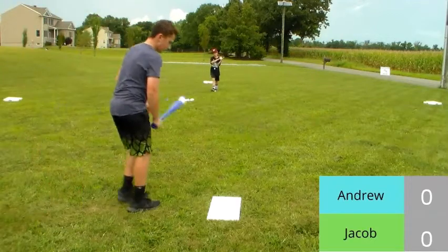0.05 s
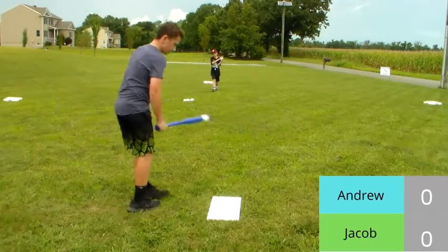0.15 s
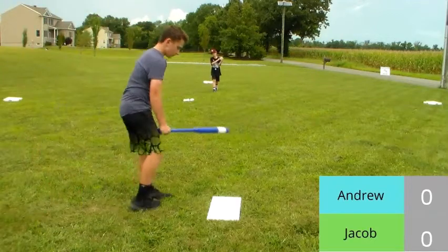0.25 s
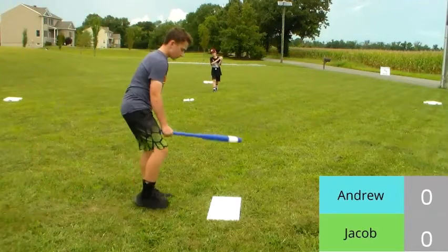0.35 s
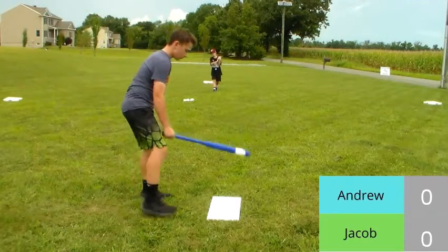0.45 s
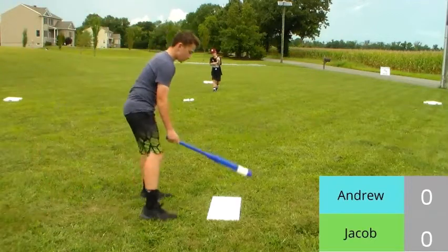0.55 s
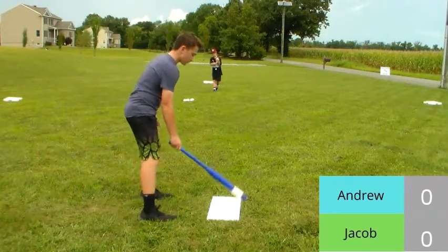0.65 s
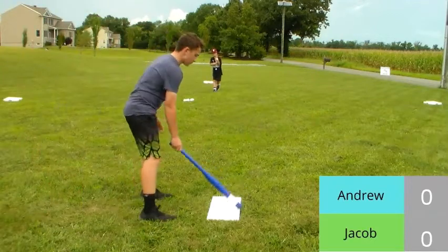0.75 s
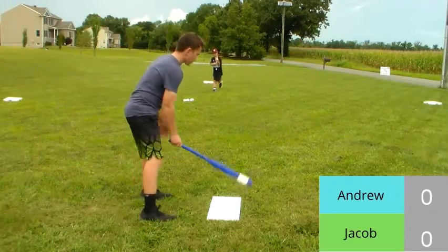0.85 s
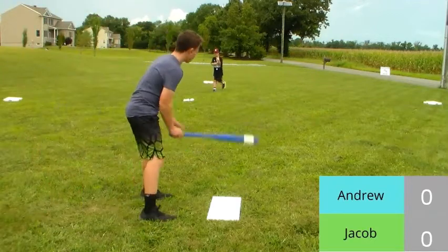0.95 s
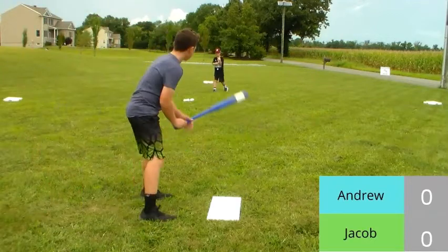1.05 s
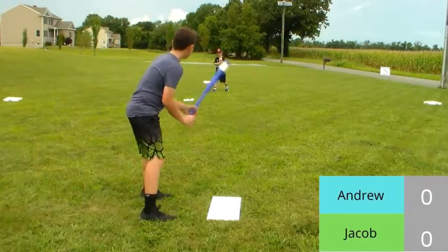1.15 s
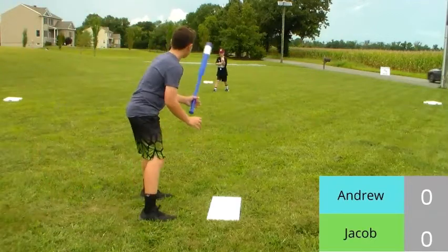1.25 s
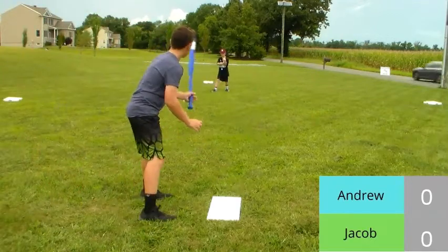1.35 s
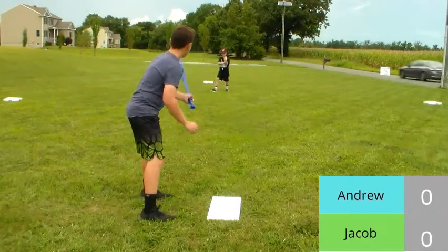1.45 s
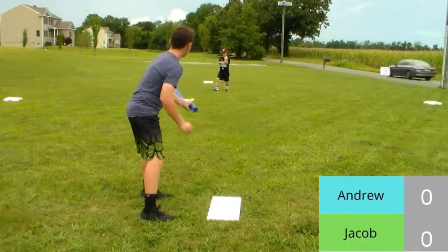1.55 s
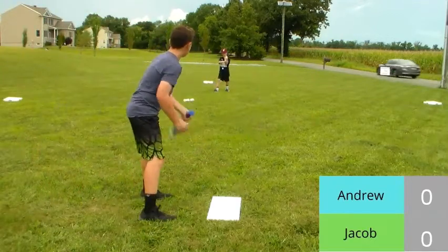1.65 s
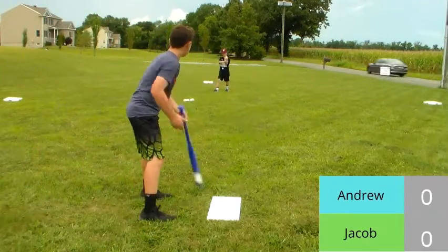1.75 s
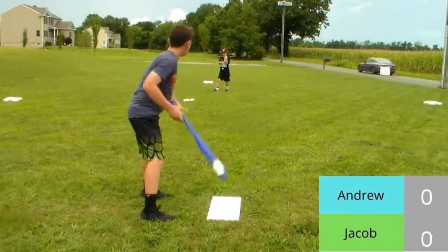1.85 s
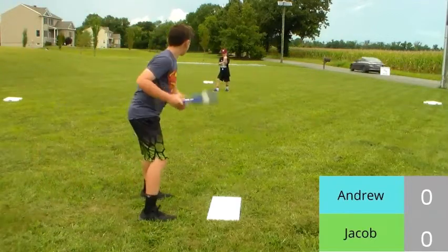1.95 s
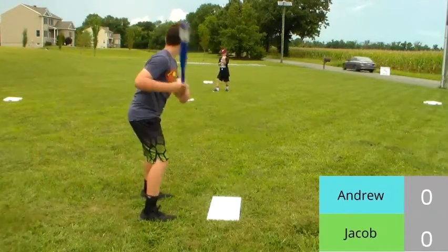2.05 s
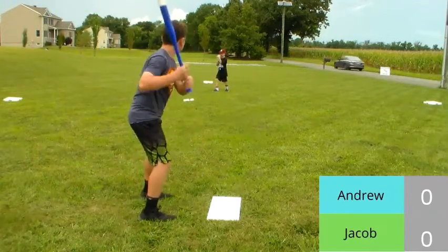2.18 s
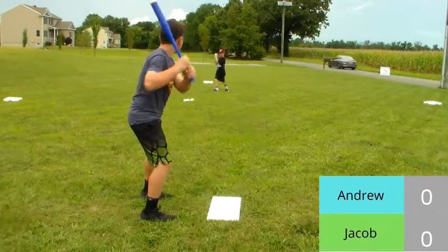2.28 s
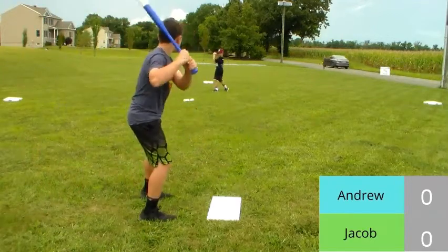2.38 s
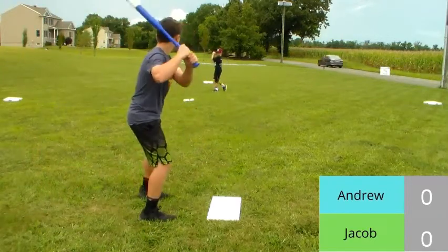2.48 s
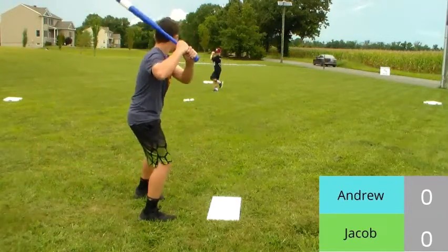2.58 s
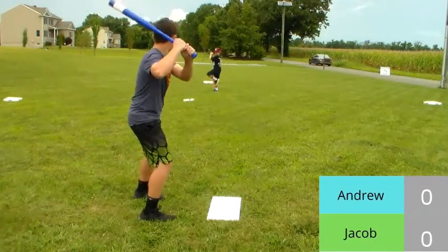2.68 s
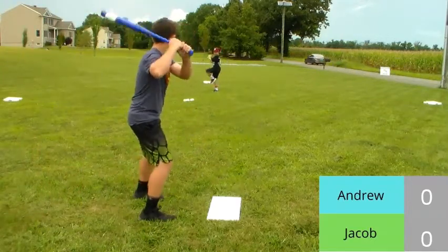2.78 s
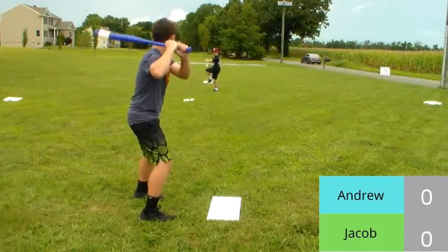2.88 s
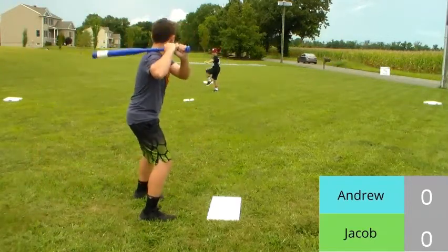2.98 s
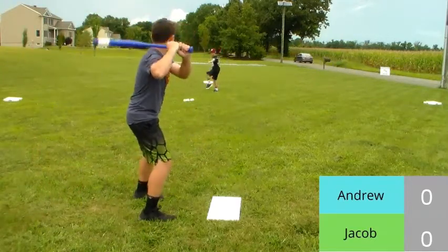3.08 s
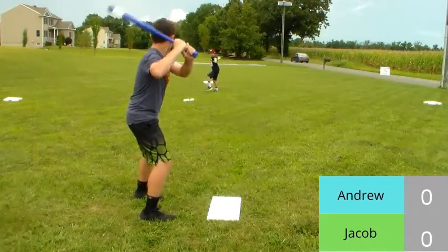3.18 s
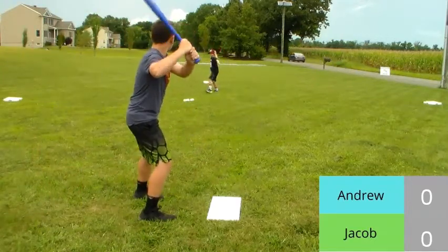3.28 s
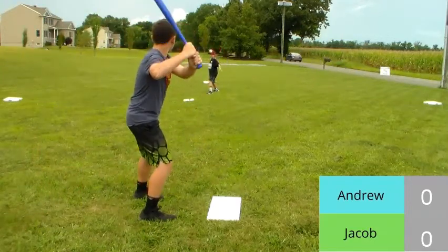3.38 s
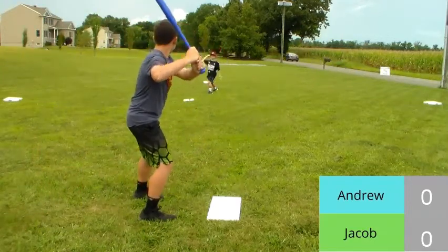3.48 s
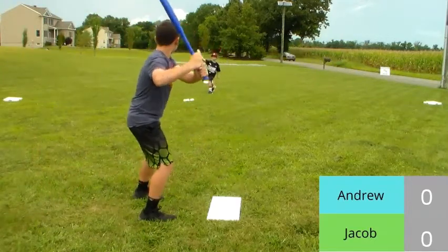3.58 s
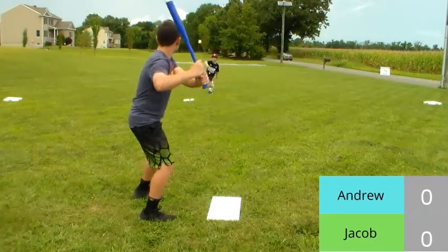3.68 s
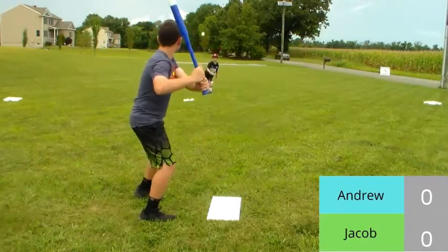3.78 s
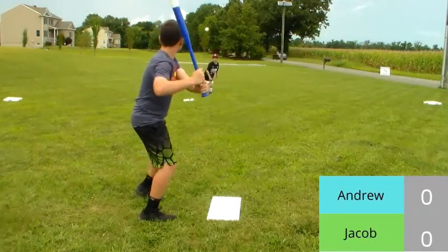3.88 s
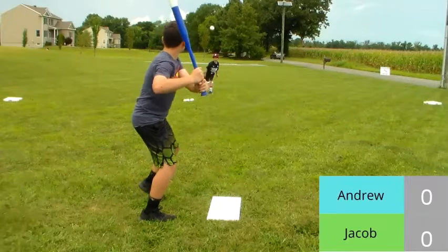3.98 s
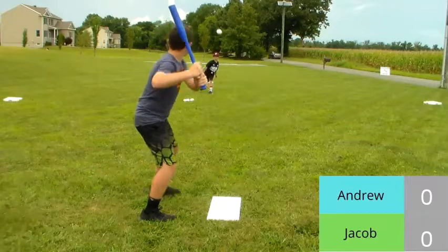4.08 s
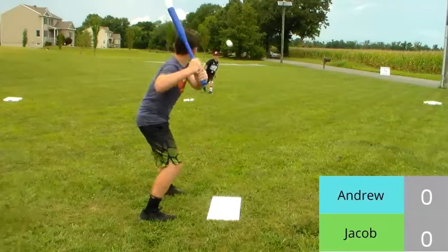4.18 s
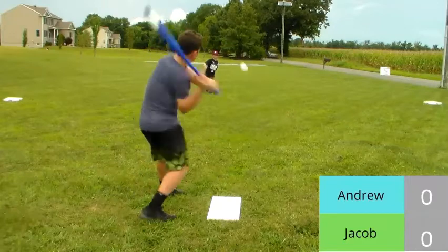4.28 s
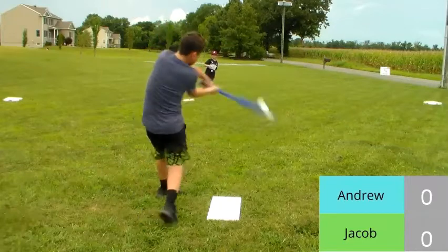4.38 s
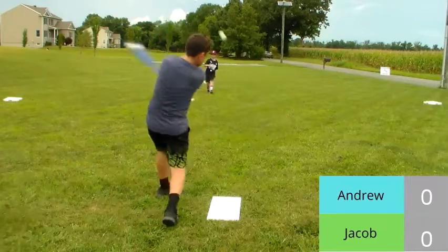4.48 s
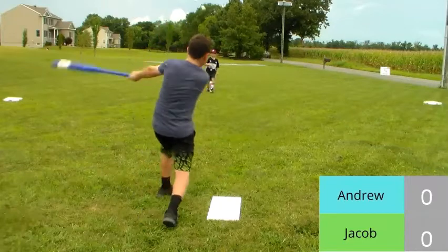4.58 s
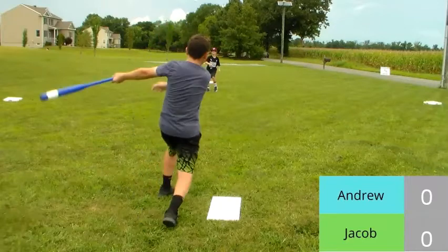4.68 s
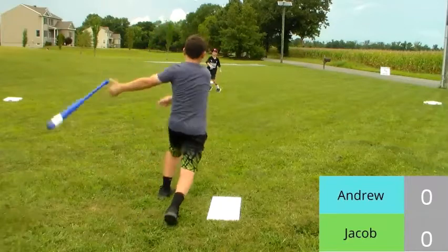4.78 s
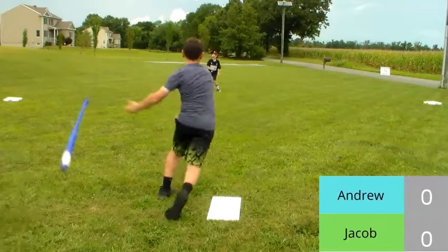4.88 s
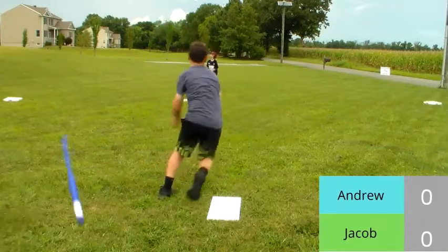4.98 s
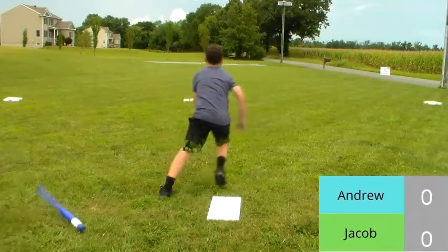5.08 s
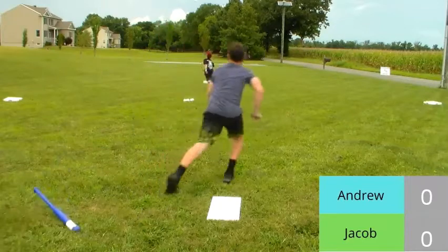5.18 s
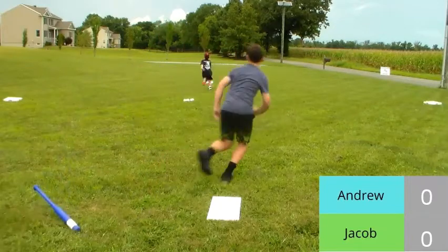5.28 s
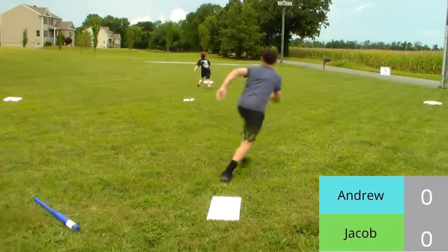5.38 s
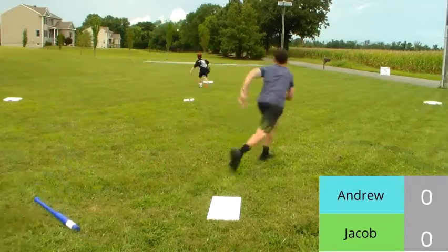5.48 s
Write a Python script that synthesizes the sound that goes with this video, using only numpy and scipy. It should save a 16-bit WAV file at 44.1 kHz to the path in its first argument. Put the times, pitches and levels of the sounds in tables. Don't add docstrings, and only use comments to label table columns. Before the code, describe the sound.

A hollow bat clatters on a plastic plate, insects chirp over a receding car, then a loud crack echoes before running footsteps in grass.

```python
import sys
import numpy as np
from scipy import signal
from scipy.io import wavfile
from scipy.ndimage import uniform_filter1d, map_coordinates

SR = 44100
rng = np.random.default_rng(int(sys.argv[2]) if len(sys.argv) > 2 else 0)


def gain_from_db(level_db):
    decades = np.asarray(level_db, float) / 20
    return 10 ** decades


def generate_wav(sig):
    pcm = np.round(np.clip(np.atleast_2d(sig).T, -1, 1) * 32767).astype(np.int16)
    wavfile.write(sys.argv[1], SR, pcm)


N = 244480
TOP_HZ = 14300


def evened(x):
    return x / np.sqrt(np.mean(x ** 2) + 1e-20)


def read(points, hz):
    point_hz, value = np.transpose(points)
    return np.interp(np.log(hz + 1), np.log(point_hz + 1), value)


def curve(rows, column=1):
    rows = np.asarray(rows)
    return np.interp(np.arange(N) / SR, rows[:, 0], rows[:, column])


def add(mix, start_s, sound):
    part = mix[..., round(start_s * SR):]
    part = part[..., :sound.shape[-1]]
    part += sound[..., :part.shape[-1]]


def noise(points, same, patchy_db, size=1024):
    hop = size // 4
    hz = np.fft.rfftfreq(size, 1 / SR)
    a, b, c, d, patches = rng.standard_normal((N // hop + 5, len(hz), 5)).T
    patches = uniform_filter1d(patches, size=9, axis=0)
    patches = evened(uniform_filter1d(patches, size=11, axis=1))
    same = np.clip(same, 0, 1)
    left = a + 1j * b
    right = same * left + np.sqrt(1 - same ** 2) * (c + 1j * d)
    level = gain_from_db(read(points, hz)[:, None] + patchy_db * patches)
    both = np.array([left, right]) * level * (hz < TOP_HZ)[:, None]
    sound = signal.istft(both, nperseg=size, noverlap=size - hop)[1]
    return evened(sound[:, :N])


def panned(db):
    return gain_from_db(np.array([db / 2, -db / 2]))[:, None]


def lagged(x, samples):
    when = np.arange(N) - samples
    return np.array([map_coordinates(x[0], [when], order=3, mode="nearest"), x[1]])


def puff(length_s, edge):
    return signal.windows.tukey(round(length_s * SR), np.clip(edge, .05, 1))


def ring(modes, blow, turn):
    t = np.arange(4000) / SR
    sound = np.zeros(len(t))
    for k, (hz, db, t60) in enumerate(modes):
        sound += turn ** k * gain_from_db(db - 60 * t / t60) * np.sin(2 * np.pi * hz * t)
    return np.convolve(sound, blow / blow.sum())


# (frequency [Hz], level [dB per Hz])
FIELD_SPECTRUM = [(1470, -33.5), (2500, -0.5), (3490, -3), (3950, -12.5), (4510, 0), (4950, -8), (5650, -7),
                  (6300, -6), (6550, -1.5), (8270, -5.5), (10500, -9), (13500, -9.5), (14400, -15),
                  (14800, -45), (16000, -62.5)]


def field():
    return gain_from_db(-57) * noise(FIELD_SPECTRUM, 0.25, 1.0)


# (time [s], level [dB], nearness [0-1])
CAR_DRIVE = [(0, -35, 0.91), (.3, -34, 0.94), (.6, -36, 0.84), (.85, -37, 0.83), (1.05, -34.5, 0.57),
             (1.3, -36.5, 0.54), (1.8, -38.5, 0.35), (2.3, -39.5, 0.15), (2.8, -40.5, 0.04),
             (3.3, -43.5, 0.2), (3.8, -44.5, 0.09), (4.5, -43, 0), (5.55, -47, 0.23)]
# (frequency [Hz], level [dB per Hz])
CAR_NEAR_SPECTRUM = [(76, -32), (130, -19), (178, -11), (214, -1.5), (315, -8.5), (454, -8), (930, -7),
                     (1080, -11.5), (1410, -14.5), (2570, -21.5), (3780, -29), (4610, -29), (5360, -34.5),
                     (6440, -39), (7000, -45.5), (9100, -76.5), (15400, -120)]
# (frequency [Hz], level [dB per Hz])
CAR_MID_SPECTRUM = [(76, -40.5), (130, -15), (211, 2.5), (338, -12.5), (448, -14), (550, -9.5),
                    (695, -18.5), (981, -10), (1670, -11), (2510, -23), (4210, -28.5), (4560, -41.5),
                    (5500, -40), (7150, -79.5), (12100, -120)]
# (frequency [Hz], level [dB per Hz])
CAR_FAR_SPECTRUM = [(76, -12), (130, -3.5), (176, -4), (216, -1.5), (339, -15.5), (422, -9), (581, -15.5),
                    (616, -14.5), (744, -16), (1190, -11), (1890, -18.5), (2420, -30.5), (4200, -32.5),
                    (5460, -56), (9240, -120)]
# (frequency [Hz], level [dB per Hz])
DRONE_SPECTRUM = [(50, -40.5), (79, 4.5), (100, -12), (180, -11.5), (214, 0.5), (245, -18), (295, -10),
                  (340, -39.5)]


def car():
    near = np.clip(curve(CAR_DRIVE, column=2), 0, 1)
    close_share = np.clip(2 * near - 1, 0, 1)
    middle_share = 1 - abs(2 * near - 1)
    far_share = np.clip(1 - 2 * near, 0, 1)
    roar = np.sqrt(close_share) * noise(CAR_NEAR_SPECTRUM, 0.98, 0.27)
    roar += np.sqrt(middle_share) * noise(CAR_MID_SPECTRUM, 0.96, 1.0)
    roar += np.sqrt(far_share) * noise(CAR_FAR_SPECTRUM, 0.99, 0.92)
    drone = gain_from_db(-5.5) * near * noise(DRONE_SPECTRUM, 0.95, 1.5, size=4096)
    sound = gain_from_db(curve(CAR_DRIVE)) * (roar + drone) * panned(-.6)
    return lagged(sound, 3.56 * near ** 2)


# (frequency [Hz], level [dB per Hz])
BUFFET_SPECTRUM = [(8.8, -36), (15, -2.5), (76, 2), (155, -8), (178, -18), (219, -16), (280, -21.5),
                   (353, -37.5), (400, -21), (520, -61), (880, -120)]
# (time [s], level [dB])
BREEZE_LEVEL = [(0, -49), (.5, -41.5), (.85, -48), (1.3, -44.5), (2.5, -47), (3.5, -47.5), (4.5, -44.5),
                (4.94, -34.5), (5.15, -48.5), (5.55, -46)]
# (middle [s], length [s], level [dB], left minus right [dB])
GUST_EVENTS = [(.04, 0.09, -63, 7), (0.282, 0.11, -38, 16), (0.462, 0.084, -36, 21.5),
               (0.603, 0.093, -58, 11), (0.752, 0.087, -46, 12), (1.06, 0.082, -33, 14),
               (1.17, 0.21, -42.5, 11.5), (1.42, .08, -42, 6), (2.775, 0.26, -43, 11),
               (3.186, 0.19, -44, 20.5), (3.267, 0.063, -35.5, 22), (3.367, 0.16, -38, 8.5),
               (3.691, 0.38, -38.5, 11), (3.893, 0.25, -36.5, 17.5), (4.066, 0.43, -45.5, 15.5),
               (4.468, 0.12, -45.5, 17), (5.04, .08, -41, 17), (5.267, 0.32, -39.5, 19),
               (5.435, 0.088, -35, 10.5), (5.54, 0.11, -45.5, 19)]


def wind():
    lumps = noise(BUFFET_SPECTRUM, .55, 2.2, size=2048)
    power = (gain_from_db(curve(BREEZE_LEVEL)) * panned(3.5)) ** 2
    for middle_s, length_s, db, pan_db in GUST_EVENTS:
        gust = gain_from_db(db) * panned(pan_db) * puff(length_s, 0.93)
        add(power, max(middle_s - length_s / 2, 0), gust ** 2)
    return gain_from_db(3.5) * np.sqrt(power) * lumps


# (middle [s], level [dB])
CHORUS_SWELLS = [(.28, -60.5), (.57, -68), (1.16, -61), (1.5, -58), (1.72, -63), (1.96, -57.5), (2.26, -60),
                 (2.56, -57), (2.87, -57.5), (3.16, -59), (3.5, -59), (3.83, -59), (4.12, -59.5),
                 (4.43, -56.5), (5.1, -58), (5.4, -58.5)]


def katydids():
    spectrum = [(5700, -47.5), (6150, -11.5), (6400, 1.5), (6700, -8), (7200, -8.0), (7800, -35.5)]
    rasp = noise(spectrum, 0.26, 0.55, size=512)
    power = np.full(N, gain_from_db(-61.5) ** 2)
    swell_s = 0.36
    for middle_s, db in CHORUS_SWELLS:
        add(power, middle_s - swell_s / 2, (gain_from_db(db) * puff(swell_s, 0.97)) ** 2)
    return np.sqrt(power) * rasp


# (time [s], ticks so far [count])
TICK_COUNT = [(.004, 0), (.938, 17), (2.044, 37), (3.209, 58), (4.467, 81), (5.51, 100)]


def ticker():
    out = np.zeros((2, N))
    t = np.arange(round(0.011 * SR)) / SR
    pitch_hz = 7780 * (1 + 1.8 * t)
    tone = np.sin(2 * np.pi * np.cumsum(pitch_hz) / SR) * np.hanning(len(t))
    time_s, count = np.transpose(TICK_COUNT)
    for start_s in np.interp(np.arange(count[-1]), count, time_s):
        db = -58.7 + 0.5 * rng.standard_normal()
        add(out, start_s, gain_from_db(db) * panned(.3) * tone)
    return out


# (pitch [Hz], left minus right [dB])
CRICKET_VOICES = [(4610, 20.5), (4380, 10), (4500, 24)]
# (start [s], level [dB])
CRICKET_CHIRPS = [
    [(1.098, -59), (1.434, -56.5), (1.801, -57), (2.19, -57.5), (2.693, -58), (3.077, -57), (3.56, -57),
     (4.06, -56), (4.48, -59), (5.115, -70), (5.49, -75)],
    [(1.428, -58), (1.839, -52), (2.233, -52.5), (2.81, -53), (3.238, -52), (3.7, -53), (4.109, -53),
     (5.286, -55)],
    [(.898, -64), (1.727, -61), (2.125, -60), (2.59, -61.5), (2.99, -67), (3.865, -65), (4.26, -65),
     (5.0, -58), (5.08, -62)],
]
WING_STROKES = [-5, -2.5, -4]


def crickets():
    out = np.zeros((2, N))
    t = np.arange(round(0.023 * SR)) / SR
    sag = 1.04 - 2.7 * t
    stroke_gap_s, pitch_scatter = .043, 0.0051
    for (hz, pan_db), chirps in zip(CRICKET_VOICES, CRICKET_CHIRPS):
        for start_s, db in chirps:
            for k, stroke_db in enumerate(WING_STROKES):
                pitch_hz = hz * (1 + pitch_scatter * rng.standard_normal())
                tone = np.sin(2 * np.pi * np.cumsum(pitch_hz * sag) / SR)
                tone *= signal.windows.tukey(len(t), .6)
                add(out, start_s + k * stroke_gap_s, gain_from_db(db + stroke_db) * panned(pan_db) * tone)

    blur = rng.standard_normal((2, 2000)) * np.exp(-np.arange(2000) / SR / 0.011)
    blur /= np.linalg.norm(blur[0])
    out += gain_from_db(-3.5) * signal.oaconvolve(out, blur, axes=1)[:, :N]

    throb = np.cos(np.pi * 23.5 * np.arange(N) / SR) ** 2
    spectrum = [(4150, -40.0), (4400, -10.5), (4550, 7.0), (4750, -11.5), (5000, -45)]
    far = noise(spectrum, 0.27, 4.1, size=512)
    return out + gain_from_db(-65) * (0.16 + throb) * far * panned(3.2)


# (time [s], level [dB], dull edge [Hz], length [s])
CRACK_ECHOES = [
    (4.576, -39, 6000, 0.003),
    (4.632, -30, 6000, 0.0044),
    (4.758, -38, 5020, 0.017),
]
# (time [s], level [dB], dull edge [Hz], length [s])
GRASS_STEPS = [(5.018, -53, 1500, .01), (5.112, -40, 3000, 0.0039), (5.161, -42, 7000, 0.0057),
               (5.171, -38, 11000, 0.0044), (5.26, -45, 11000, 0.0051), (5.266, -43, 9000, 0.008),
               (5.349, -37, 3500, 0.0035)]


def scuffs():
    out = np.zeros((2, N))
    t = np.arange(3000) / SR
    for start_s, db, dull_hz, length_s in CRACK_ECHOES + GRASS_STEPS:
        shared, *sides = rng.standard_normal((3, len(t)))
        burst = shared + 0.17 * np.array(sides)
        band = signal.butter(5, [350, dull_hz], "bandpass", fs=SR, output="sos")
        burst = signal.sosfilt(band, burst)
        burst = signal.lfilter(*signal.butter(1, 2500, fs=SR), burst)
        swell_and_die = (1 - np.exp(-t / 0.001)) * np.exp(-t / length_s)
        add(out, start_s, gain_from_db(db) * evened(burst) * swell_and_die)
    return out


# (frequency [Hz], level [dB], time to fall 60 dB [s])
PLATE_MODES = [(527, -10.5, 0.11), (684, -5, 0.055), (956, -3, 0.058), (1345, 0.5, 0.049),
               (1414, 4.5, 0.033), (1830, -10.5, 0.027), (2250, -7.5, 0.026), (2600, -6, 0.036),
               (3240, -12.5, 0.022), (3640, -12.5, .015), (4600, -9, 0.0054), (8000, -15, 0.0044)]


def tap():
    out = np.zeros((2, N))
    sound = gain_from_db(-23.5) * ring(PLATE_MODES, np.hanning(6), -1.02)
    add(out, .8574, sound[None])
    add(out, .8629, gain_from_db(-11.5) * sound[None])
    return lagged(out, .6)


# (frequency [Hz], level [dB], time to fall 60 dB [s])
BAT_MODES = [(576, -14, .019), (1070, -21, .031), (1290, -20, .045), (1745, -17, .02), (2270, -27, .03),
             (2550, -22, .025), (3255, -31, .03), (3730, -23, .036), (4370, -31, .035), (6700, -24, .004),
             (10200, -19, .003), (13200, -19, .003)]
# (delay [s], level [dB], dull edge [Hz])
CRACK_PATHS = [(0, 0, 15000), (.00157, -6, 2070), (.00265, -13.3, 5300), (.00422, -5, 4500),
               (.00633, -17, 3000)]


def crack():
    t = np.arange(400) / SR
    suction = -1.5 * np.exp(-((t - .00019) / .000019) ** 2)
    u = np.maximum(t - .000225, 0) / .00012
    blow = 1.12 * (1 - np.exp(-u * 10)) * (1 - .2 * u) * np.exp(-.55 * u)
    direct = np.zeros(4100)
    add(direct, .00025, ring(BAT_MODES, np.hanning(4), 1))
    add(direct, 0, suction + blow)
    direct = signal.lfilter(*signal.butter(4, 520, "highpass", fs=SR), direct)
    out = np.zeros((2, N))
    for delay_s, db, dull_hz in CRACK_PATHS:
        dull = signal.sosfilt(signal.butter(4, dull_hz, fs=SR, output="sos"), direct)
        add(out, 4.5329 + delay_s, gain_from_db(db) * dull * panned(-.5))
    return lagged(out, .45)


def scene():
    background = field() + car() + wind()
    insects = katydids() + ticker() + crickets()
    return background + insects + scuffs() + tap() + crack()


# (frequency [Hz], level [dB per Hz])
HISS_SPECTRUM = [(120, -36.5), (200, -7), (263, -5), (360, -18), (424, -16.5), (735, -13), (1400, -13),
                 (4950, -19), (11300, -23), (13800, -20), (16000, -41.5)]


def hiss():
    return gain_from_db(-68.5) * noise(HISS_SPECTRUM, 0.17, .6)


# (time [s], gain [dB])
GAIN_STEPS = [(0, 7.5), (.465, 7.5), (.48, 4.5), (.858, 7), (.868, -1.5), (1.1, -1.25), (1.6, -0.47),
              (4.5333, 0), (4.542, -19), (4.549, -24), (4.7, -24), (4.94, -30), (5.03, -12), (5.14, -5.5),
              (5.22, 0), (5.55, 3)]


def gain_control(dry):
    return dry * gain_from_db(curve(GAIN_STEPS))


def roll_off(x):
    return signal.sosfilt(signal.butter(12, 16520, fs=SR, output="sos"), x)


def record(dry):
    mix = gain_control(dry) + hiss()
    return roll_off(np.clip(mix, -.99, .99))


dry = scene()
out = record(dry)
generate_wav(out)
```